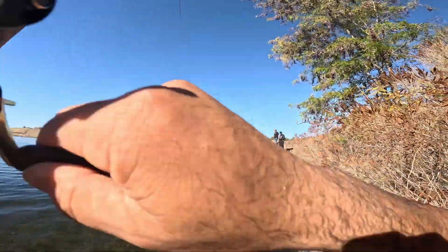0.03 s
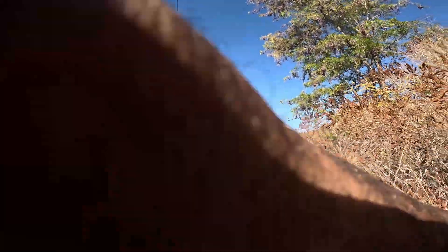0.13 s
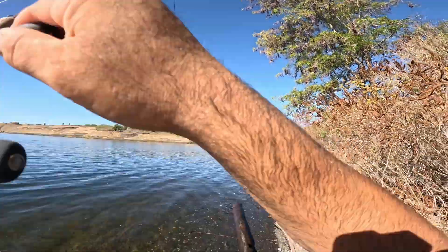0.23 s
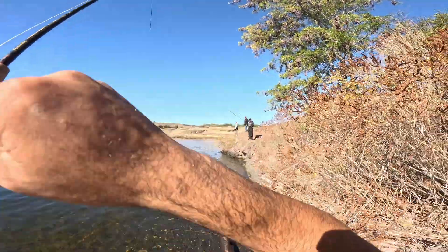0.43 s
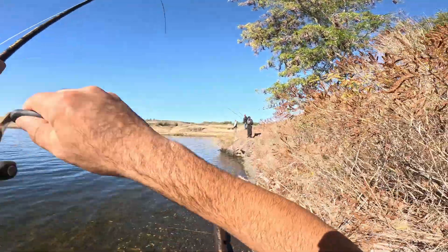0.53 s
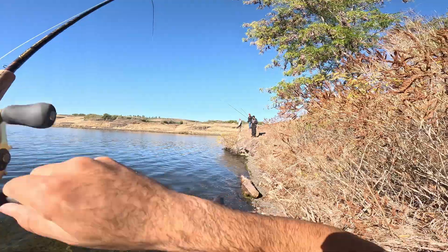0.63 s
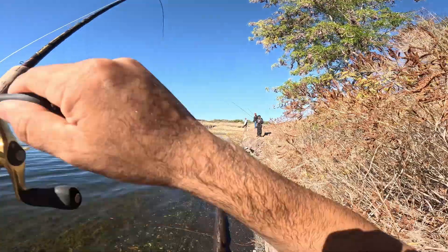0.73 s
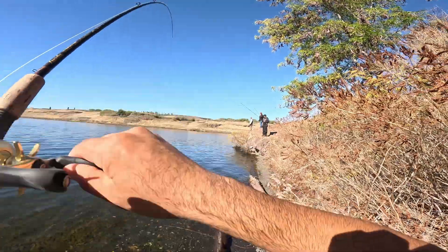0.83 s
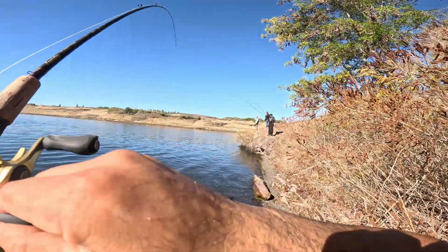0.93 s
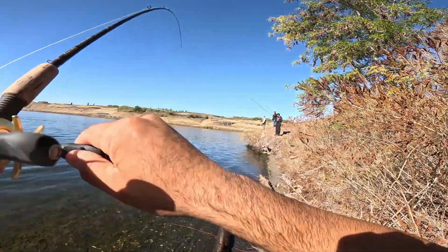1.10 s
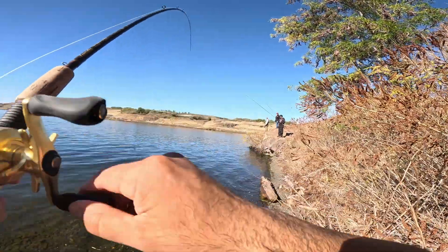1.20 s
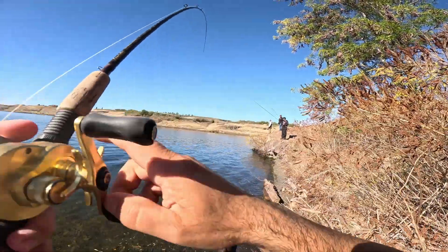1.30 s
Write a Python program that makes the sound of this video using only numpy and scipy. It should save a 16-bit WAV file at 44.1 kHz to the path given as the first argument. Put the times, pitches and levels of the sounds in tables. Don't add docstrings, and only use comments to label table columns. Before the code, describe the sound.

A fishing reel's crisp metallic ratchet clicks close by, shudders into a hard low knock, creeps slowly, then buzzes in three fast runs with fine gear whirr; faint handling and wind, dry open bank, close body-worn microphone.

```python
import sys
import numpy as np
from scipy import signal
from scipy.fft import rfft, irfft, next_fast_len
from scipy.io import wavfile
from scipy.ndimage import uniform_filter1d, map_coordinates

SR = 44100
rng = np.random.default_rng(int(sys.argv[2]) if len(sys.argv) > 2 else 0)


def volts_from_decibels(level):
    exponent = np.asarray(level, float) / 20
    return 10 ** exponent


def generate_wav(sig):
    pcm = np.round(np.clip(np.atleast_2d(sig).T, -1, 1) * 32767).astype(np.int16)
    wavfile.write(sys.argv[1], SR, pcm)


N = 59535
T = np.arange(N) / SR


def unit(x):
    return x / np.sqrt(np.mean(x ** 2) + 1e-20)


def along(points, hz):
    f, v = np.transpose(points)
    return np.interp(np.log(hz + 1), np.log(f + 1), v)


def wobble(rate):
    knots = rng.standard_normal(int(N * rate / SR) + 4)
    return map_coordinates(knots, [T * rate])


def filtered(x, response):
    m = next_fast_len(N + SR // 4)
    return irfft(rfft(x, m) * response(np.fft.rfftfreq(m, 1 / SR)), m)[..., :N]


def rush(spectrum, patchy_db):
    z = signal.stft(rng.standard_normal((2, N)), nperseg=256)[2]
    patches = uniform_filter1d(rng.standard_normal(z.shape[1:]), size=3, axis=0)
    patches = uniform_filter1d(patches, size=5, axis=1)
    pair = signal.istft(z * volts_from_decibels(patchy_db * unit(patches)), nperseg=256)[1][:, :N]
    return unit(filtered(pair, lambda hz: volts_from_decibels(along(spectrum, hz))))


def wind():
    # (time [s], level [dB])
    gusts = [(0, -30.5), (.08, -33), (.125, -37.5), (.2, -55), (.27, -20.5), (.3, -48), (.325, -45),
             (.37, -36), (.41, -54), (.56, -56), (.62, -45.5), (.74, -50.5), (.86, -40), (.92, -59.5),
             (1.05, -44), (1.13, -51.5), (1.25, -48), (1.35, -53)]
    # (frequency [Hz], density [dB per Hz])
    buffet = [(8.8, -37), (15, 8.5), (38, -0.5), (70, -9), (145, -15), (250, -18), (320, -68), (550, -120)]
    lumps = volts_from_decibels(2 * wobble(30))
    noise = rush(buffet + [(500, -55.5)], patchy_db=2.0)[0]
    return volts_from_decibels(np.interp(T, *np.transpose(gusts))) * unit(lumps * noise)


def air():
    # (frequency [Hz], density [dB per Hz])
    hiss_colour = [(120, -41), (200, -36), (448, 2.5), (966, -11.5), (1390, -2.5), (1830, -6), (2010, -8),
                   (4260, -9.5), (15900, -35)]
    return volts_from_decibels(-56) * rush(hiss_colour, patchy_db=1.5)


def rustle():
    # (time [s], level [dB], brightness [0-1])
    handling = [(0, -43, 0.12), (.06, -41, 0.13), (0.143, -46, 0.01), (0.224, -32.5, 0.15), (.26, -51, 0.3),
                (.33, -54.5, 0.4), (0.362, -40, 0.21), (.41, -47, 1), (.46, -52.5, 0.42), (0.59, -72, 0.75),
                (0.597, -41.5, 0.84), (0.65, -41.5, 0.86), (0.682, -55.5, 0.35), (.87, -53.5, 0.3),
                (.91, -50.5, 0.4), (1.03, -52.5, 0.18), (1.13, -43, 0.4), (1.35, -49, 0.06)]
    # (frequency [Hz], density [dB per Hz])
    cloth = [(90, -6), (200, -3.5), (450, 0), (900, -7), (2500, -20.5), (6000, -74)]
    # (frequency [Hz], density [dB per Hz])
    scuff = [(300, -15), (700, -6), (1200, -2), (1800, -4.5), (3200, -12), (6000, -34)]
    s, effort_db, bright = np.transpose(handling)
    share = np.interp(T, s, bright)
    lumps = volts_from_decibels(2 * wobble(110) + wobble(30))
    dull = np.sqrt(1 - share) * rush(cloth, patchy_db=3.5)
    scrape = np.sqrt(share) * rush(scuff, patchy_db=3.0)
    return volts_from_decibels(np.interp(T, s, effort_db)) * unit(lumps * (dull + scrape))


def shudder():
    jolt_s = [
        .001,
        .2443,
        .2476,
        .2517,
        .2532,
        .262,
    ]
    jolt_db = [-29.5, -29.5, -22, -25, -18, -38.5]
    # (frequency [Hz], gain [dB])
    jolt_colour = [(250, -6), (650, 7), (1400, 0), (2300, -8), (4000, -13), (8000, -27), (15000, -44)]
    stiffen_s, jam_s, ring_s, push_s = .2468, .2547, .2547, .2585
    swell_hz, stiff_hz, ring_hz, push_hz = 238, 297, 240, 27

    late = T - stiffen_s
    growth = np.where(late < 0, 900, 300)
    grow_db = growth * np.minimum(late, jam_s - stiffen_s)
    swell = volts_from_decibels(-3.7 + grow_db) * np.cos(2 * np.pi * np.where(late < 0, swell_hz, stiff_hz) * late)
    swell += .35 * swell ** 2 * np.clip((.5 / stiff_hz - late) / .0004, 0, 1)
    swell *= np.clip((jam_s - T) / .0007, 0, 1)

    after, slow = np.maximum(T - ring_s, 0), np.maximum(T - push_s, 0)
    ring = -volts_from_decibels(-10.5 - 60 * after / .043) * np.sin(2 * np.pi * ring_hz * after)
    push = -volts_from_decibels(-6 - 60 * slow / .062) * np.sin(2 * np.pi * push_hz * slow)

    gate = np.zeros(N)
    for s, db in zip(jolt_s, jolt_db):
        gate += volts_from_decibels(db - 60 * np.maximum(T - s, 0) / .009) * (T >= s)
    cracks = filtered(gate * rng.standard_normal(N), lambda f: volts_from_decibels(13.5 + along(jolt_colour, f)))
    return swell + ring + push + cracks


def plops():
    # (time [s], level [dB], pitch [Hz], length [s])
    bumps = [(.001, -25.5, 138.2, 0.022), (0.034, -27, 221, 0.0079), (0.039, -43, 1000, 0.0057),
             (0.111, -25.5, 282, 0.011), (0.126, -38.5, 504, .012), (0.152, -38.5, 1067, 0.0151),
             (0.175, -35, 584, 0.025), (.1942, -19.5, 607, 0.0063), (0.1953, -35, 910, 0.0047),
             (.203, -33.5, 950, 0.0072), (.252, -30.5, 540, 0.012), (.254, -25.5, 155, 0.019),
             (0.211, -27.5, 532, 0.009), (0.356, -37.5, 396, 0.017), (0.384, -43.5, 958, 0.015),
             (0.394, -37.5, 1406, 0.015), (0.421, -43, 1118, 0.023), (0.436, -42.5, 870, 0.011),
             (0.507, -50.5, 1390, 0.0087), (0.542, -50, 1700, 0.003), (0.549, -51.5, 1410, 0.0072),
             (0.599, -32, 286, 0.0029), (0.601, -41.5, 1295, 0.014), (0.611, -38.5, 914, 0.021),
             (.678, -37, 168, 0.01), (1.008, -46.5, 1247, 0.017), (1.145, -38.5, 1036, 0.0062),
             (0.794, -46, 1243, .012), (.883, -58, 1280, 0.017), (0.891, -47, 522, .016),
              (0.898, -49, 913, 0.019), (0.904, -47, 620, .02), (0.924, -52.5, 1316, 0.016),
              (.935, -50, 635, 0.019), (.937, -52, 1270, 0.011), (.968, -47.5, 710, 0.018),
              (.968, -48.5, 1306, 0.016), (1.054, -46, 484, 0.01), (1.055, -47, 2365, 0.011),
              (1.061, -55, 2630, .01), (1.053, -51, 3390, 0.015), (1.067, -50.5, 560, .014),
              (1.082, -50, 485, 0.013), (1.1, -48, 1310, 0.014), (1.118, -45, 875, 0.011),
              (1.124, -51, 438, 0.0092), (1.155, -45.5, 560, 0.0091), (1.165, -50, 2390, 0.0089),
              (1.184, -46.5, 595, 0.0093), (1.259, -42, 1670, 0.0064), (1.27, -46, 473, 0.01),
              (1.286, -56, 547, 0.012)]
    out = np.zeros(N)
    rough, drift = volts_from_decibels(4.5 * wobble(350)), .9 * wobble(250)
    for s, db, hz, length in bumps:
        u = np.maximum(T - s, 0) / length
        shaky = min(hz / 900, 2.2)
        swell = np.e * 3.18 * u * np.exp(-(2.58 * u) ** 1.35)
        note = np.sin(2 * np.pi * hz * length * u + shaky * drift)
        out += volts_from_decibels(db) * swell * rough ** min(shaky, 1.2) * note
    return out


def resonance(f, centre, width, db):
    band = 1j * f * width
    return 1 + (volts_from_decibels(db) - 1) * band / (centre * centre - f * f + band)


def gear_whirr(drive):
    # (frequency [Hz], density [dB per Hz])
    gears = [(900, -41), (2000, 4), (5000, -8), (9000, -8), (15900, -13.5)]
    bell = np.hanning(int(2 * .048 * SR))
    effort = np.sqrt(np.abs(signal.fftconvolve(drive, bell / bell.sum(), "same")))
    return volts_from_decibels(-19 + 1.7 * wobble(58.5)) * effort * rush(gears, patchy_db=4)


def ratchet():
    near_pull = [.0147, .0395, .0636, .0882, .1081, .1244, .138, .156, .1828, .2131]
    creep = [.312, .3428, .3652, .422, .4968, .5634]
    first_run = [.5967, .6112, .623, .6346, .646, .657, .6662, .6748, .6834, .6925, .702, .711, .7204,
                 .7304, .7399, .7493, .7596, .7717, .7862, .8022]
    second_run = [.816, 0.8265, 0.834, 0.8426, .851, 0.8593, 0.867, 0.8756, 0.8838, 0.893, 0.905, 0.93,
                  0.9491, 0.9647, 0.9879, 1.0305, 1.0629]
    third_run = [1.0885, 1.1042, 1.1192, 1.1329, 1.1436, 1.1534, 1.1623, 1.173, 1.1884, 1.204, 1.2145,
                 1.2232, 1.2317, 1.2402, 1.2492, 1.2569, 1.2688, 1.281, 1.2972, 1.326, 1.3389]
    # (frequency [Hz], level near [dB], level far [dB], t60 [s])
    frame = [(3176, 2, 0, 0.0078), (4300, 4.5, -4.5, 0.0067), (4800, 4, -6.5, 0.013),
             (5780, 1.5, -16, 0.0047), (6780, 3.5, -11.5, .011), (7420, 4, -9, 0.0071),
             (9040, -3.5, -26, 0.0023), (9140, -2.5, -26, 0.0065), (10600, -5.5, -14, 0.027),
             (11620, -13.5, 0.5, 0.008), (11930, -18, 6, 0.012), (12430, -15, 5.5, 0.007),
             (15100, -6, -23.5, 0.0082), (14200, -14, -6, 0.0136)]
    # (time [s], level [dB], turned [0-1])
    reel = [(0, -23, 0.03), (.215, -26.5, 0.44), (.31, -42, 0.8), (.37, -54, 0.3), (.42, -33.5, 0.56),
            (.5, -36.5, 0.42), (.563, -42.5, 0.57), (.6, -36, 0.71), (.755, -34, 0.87), (.79, -37, 0.66),
            (.83, -32.5, 0.99), (.9, -35.5, 0.51), (1.03, -38.5, 0.65), (1.12, -33.5, 0.75),
            (1.174, -27, 0.83), (1.25, -29.5, 0.78), (1.3, -31, 0.7), (1.33, -36.5, 0.34)]
    # (time [s], hollow pitch [Hz], hollow gain [dB], spool gain [dB])
    grip = [(0, 4500, 4, 0.5), (.16, 4200, 8, 6), (.19, 4670, 0.5, 8), (.5, 4800, 4.5, 4.5),
            (.6, 4900, 7, -13), (.64, 4800, 6, 2), (.68, 3330, -14, 4.5), (.73, 3230, 1.5, 3),
            (.79, 4300, 5.5, 1), (.86, 4050, 9, -5), (.885, 4300, 9, 4), (.93, 3220, 3.5, 9),
            (1.03, 3300, 2, 11), (1.09, 3220, 5, -3), (1.16, 2900, 2.5, -6), (1.22, 2900, 2.5, -1),
            (1.266, 2820, 5, 3), (1.29, 4580, 0.5, -14)]
    hz, near_db, far_db, t60 = np.transpose(frame)
    when, snap_db, turned = np.transpose(reel)
    held, *grip_curves = np.transpose(grip)
    t = np.arange(SR // 40) / SR
    f = np.fft.rfftfreq(len(t), 1 / SR)
    clicks, drive = np.zeros((2, N + SR)), np.zeros(N)

    for s in near_pull + creep + first_run + second_run + third_run:
        detune, phase, strength = rng.standard_normal((3, 2, len(hz), 1))
        turn = 2 * np.pi * hz[:, None] * (1 + .02 * detune) * t + 3 * phase
        ring = (volts_from_decibels(2 * strength - 60 * t / t60[:, None]) * np.sin(turn)).sum(1)
        crack = volts_from_decibels(17 - 60 * t / .0065) * rng.standard_normal((2, len(t)))
        click = (1 - np.exp(-t / .0003)) ** 2 * (ring + crack)

        spread = rfft(click)
        click = irfft(spread / np.sqrt(uniform_filter1d(abs(spread) ** 2, size=25)), len(t))

        hollow_hz, hollow_db, spool_db = (np.interp(s, held, c) for c in grip_curves)
        colour = resonance(f, hollow_hz, 700, hollow_db) * resonance(f, 7400, 600, spool_db)
        colour *= volts_from_decibels(2 * np.interp(f, hz, strength[0, :, 0]))
        coloured = irfft(rfft(click) * colour, len(t)) / np.linalg.norm(click, axis=1)[:, None]

        db, start = np.interp(s, when, snap_db), round(s * SR)
        level = volts_from_decibels(db + 16.5 + .58 * phase[1 - 1, 0])
        clicks[:, start + 16:][:, :len(t)] += level * coloured
        drive[start] = volts_from_decibels(2 * db) * SR / 100

    dry_reel = clicks[:, :N] + gear_whirr(drive)

    def through_frame(mode_db):
        body = [(1400, -10), (2500, -2.5)] + list(zip(hz, mode_db))
        return filtered(dry_reel, lambda f: volts_from_decibels(along(body, f)))

    share = np.interp(T, when, turned)
    return (1 - share) * through_frame(near_db) + share * through_frame(far_db)


def scene():
    return wind() + air() + rustle() + shudder() + plops() + ratchet()


def top_cut(x):
    return signal.sosfilt(signal.butter(12, 16730, fs=SR, output="sos"), x)


def record(dry):
    # (frequency [Hz], correlation [0-1])
    alike = [(500, .9998), (1500, .9997), (3000, .999), (4500, .993), (6000, .95), (7300, .97), (9500, .88),
             (11000, .65), (12000, .15)]
    # (frequency [Hz], gain [dB])
    right_port = [(10400, 0), (11100, -3), (11900, -14), (12600, -13), (13800, -4), (14600, -4),
                  (15400, -10)]
    left, other = dry
    common = filtered(left, lambda f: along(alike, f))
    own = filtered(other, lambda f: np.sqrt(1 - along(alike, f) ** 2))
    right = filtered(common + own, lambda f: volts_from_decibels(along(right_port, f)))
    mix = filtered(np.array([left, right]), lambda f: (f < 15900) * (f > 8))
    return top_cut(mix)


dry = scene()
out = record(dry)
generate_wav(out)
```